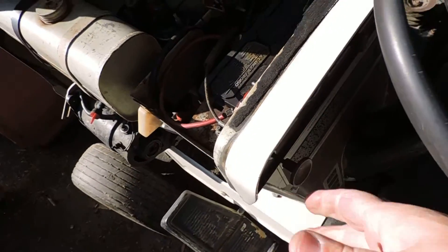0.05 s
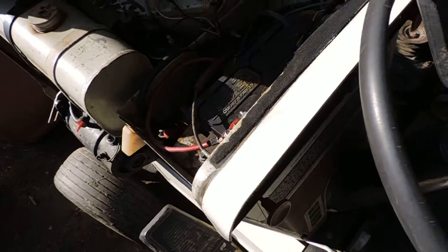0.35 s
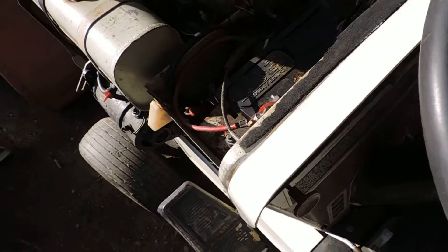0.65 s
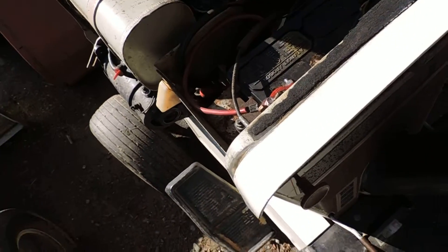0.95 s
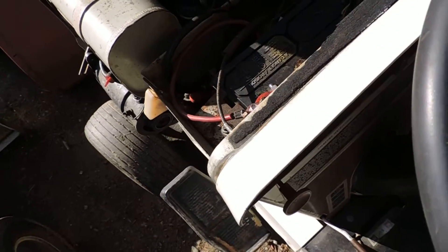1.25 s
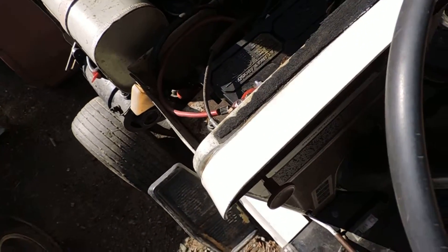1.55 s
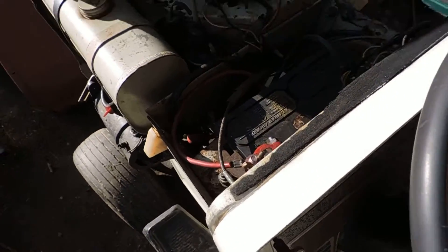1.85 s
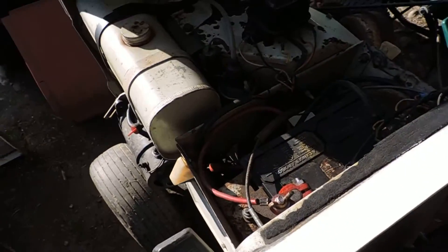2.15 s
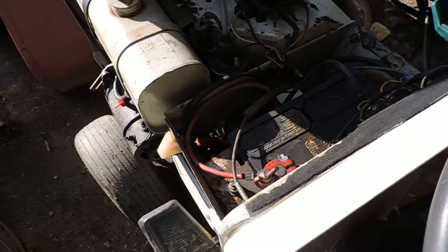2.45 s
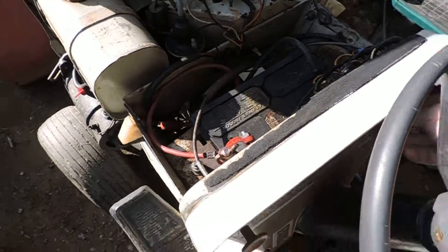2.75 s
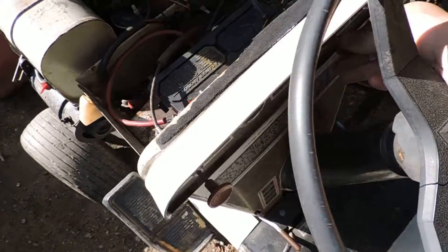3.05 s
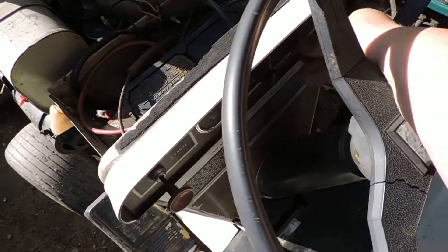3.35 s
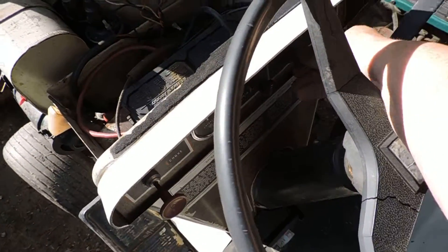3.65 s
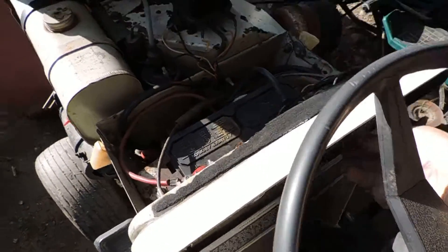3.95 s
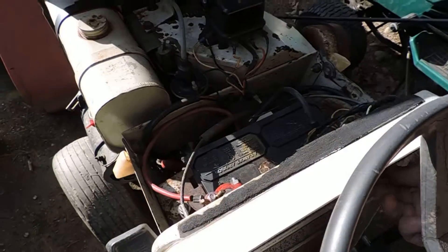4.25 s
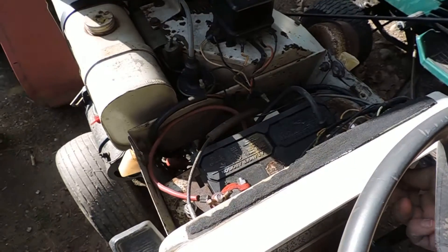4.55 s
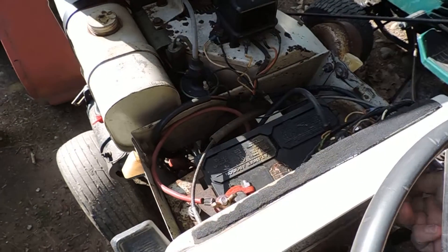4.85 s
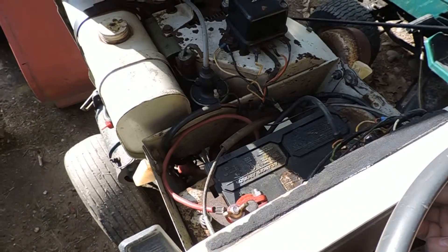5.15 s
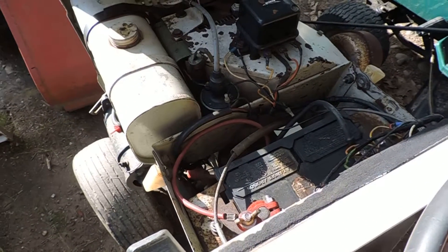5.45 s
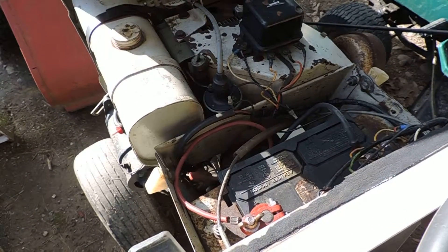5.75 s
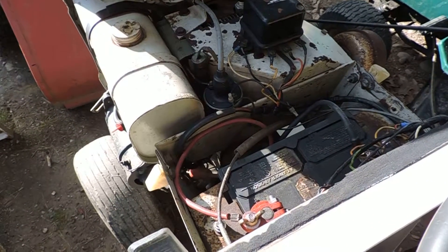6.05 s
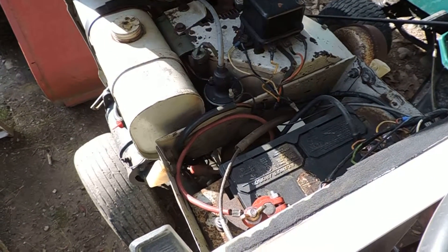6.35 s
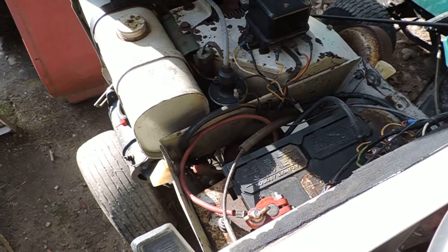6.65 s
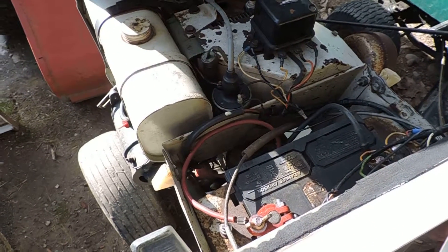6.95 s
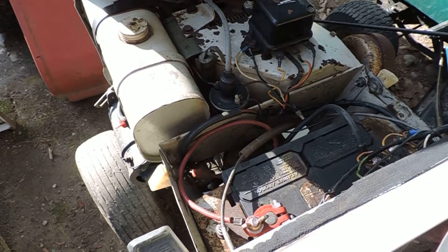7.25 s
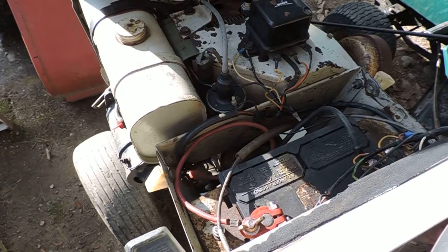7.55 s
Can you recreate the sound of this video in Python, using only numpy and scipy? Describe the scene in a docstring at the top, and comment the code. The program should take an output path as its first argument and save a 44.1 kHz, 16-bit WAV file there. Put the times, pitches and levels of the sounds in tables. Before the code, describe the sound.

Close to an old garden tractor outdoors, a hand knocks and brushes the dash while far birds chirp and gusts rumble softly on the microphone. A sharp key click is followed by a loud solenoid clunk and a fast chatter that rings the steel of the engine bay. The chatter comes in three bursts with short pauses, the background sinking under each, and the engine does not start.

```python
"""A yard, the microphone close to an old garden tractor that fails to start. At first there is only a
distant rush, wind on the microphone and far birds; a hand knocks and brushes the dash. At 3.5 s the key
snaps round, at 4.2 s the starter solenoid slams in. On the weak battery its plunger lets go and pulls in
about 21 times a second, ringing the steel of the engine bay while the background sinks.
Two more tries chatter at 5.4 s and 7 s."""
import sys
import numpy as np
from scipy import signal
from scipy.fft import rfft, irfft, next_fast_len
from scipy.io import wavfile
from scipy.ndimage import map_coordinates

SR = 44100
rng = np.random.default_rng(int(sys.argv[2]) if len(sys.argv) > 2 else 0)


def generate_wav(signal):
    """Clip the signal to [-1, 1] and save it as 16-bit WAV at the path in sys.argv[1]."""
    frames = np.transpose(np.atleast_2d(signal))
    scaled = np.clip(frames, -1, 1) * 32767
    pcm = np.round(scaled).astype(np.int16)
    wavfile.write(sys.argv[1], SR, pcm)


N = 335160
RING_T = np.arange(SR // 7) / SR  # time axis of one blow

# Levels in the tables are relative; each source adds its own gain.
# spectra of the distant rush and of wind on the microphone: f/Hz, level/dB
RUSH_SPECTRUM = [(71, -29.5), (120, 1), (157, -10), (267, -10), (321, -7.5), (592, -12), (773, -6),
                 (1050, -7), (1720, -16), (2990, -29.5), (3900, -34), (4320, -36), (14400, -47.5),
                 (16000, -45)]
WIND_SPECTRUM = [(11, -17.5), (18, 5), (55, 4), (98, -4.5), (237, -27), (267, -34), (300, -20.5),
                 (390, -52), (660, -120)]
# likeness of left and right, for far and for near sound: f/Hz, correlation
FAR_LIKENESS = [(100, 1), (400, 0.85), (1200, 0.73), (2400, 0), (4500, 0)]
NEAR_LIKENESS = [(100, 0.99), (600, 0.96), (1500, 0.89), (2500, 0.67), (4500, .25), (9000, 0.033)]
# gusts on the microphone: peak t/s, half length/s, left rise/dB, right rise/dB
GUSTS = [(0.618, .16, 7.5, -0.5), (0.987, 0.058, 17.5, 0), (2.104, 0.36, 17.5, 2), (3.555, 0.087, 3, 9.5),
         (3.976, 0.21, 10, 7), (4.31, 0.08, 16, 6.5), (5.29, 0.1, 10, 6), (6.85, 0.19, 4, 2.5)]
# dips of the background where the tractor is loud: from t/s, until t/s, depth/dB
DIPS = [(3.527, 3.644, 6), (4.173, 5.08, 15.5), (5.35, 6.507, 13.5), (6.926, 7.6, 12)]
# far bird chirps: t/s, length/s, start f/Hz, end f/Hz, level/dB
CHIRPS = [(0.707, 0.044, 3850, 4100, -65), (0.923, .05, 4400, 4750, -71), (1.521, 0.11, 3620, 2900, -61),
          (2.315, 0.05, 4600, 4800, -64), (2.37, 0.035, 4000, 3900, -69), (2.51, 0.054, 3600, 4250, -64.5),
          (3.049, 0.068, 4500, 3020, -58.5), (3.174, .1, 4520, 2600, -63), (3.87, .045, 4540, 4990, -67)]
# the yard's reverberation: f/Hz, T60/s
YARD_T60 = [(200, 0.73), (1000, 0.21), (4000, 0.38), (12000, .15)]
# dense ring of the metalwork, dying away: f/Hz, T60/s
METAL_T60 = [(200, 0.25), (800, 0.11), (2000, 0.079), (4500, 0.06), (9000, 0.034), (14000, 0.044)]
# the same ring building up: f/Hz, rise time/s
METAL_RISE = [(200, 0.0039), (800, 0.01), (2000, 0.0089), (4500, 0.00095), (12000, .0003)]
# modes of the dash, solenoid housing, frame and engine bay: f/Hz, width/Hz, level/dB
DASH_MODES = [(436, 24.8, 0), (445, 6.2, -4), (611.5, 19, 1), (752, 35, -4), (1166, 22, -7.5),
              (1470, 40, -10.5), (1630, 76, -4), (2340, 98, -5.5)]
HOUSING_MODES = [(850, 45, -7), (1045, 50, -7), (1245, 45, -14), (1500, 45, -14), (1683, 48, 1),
                 (1890, 48, -3), (1990, 45, -9), (2130, 55, -6), (2408, 65, -11), (2705, 60, -13),
                 (3536, 65, -13), (4020, 70, -17)]
FRAME_MODES = [(197.8, 13, -4.5), (290.6, 8.2, -3), (332.3, 9.9, 0.5), (436.8, 18, 4.5)]
BAY_MODES = [(580, 16, 0), (663.4, 45, -5), (846, 39, -1.5), (979, 38, 9), (1239, 14.5, 0), (1357, 29, -32),
             (1495, 28, -8.5), (1668, 71, -22), (1870, 31, -13), (1956, 16, -34), (2178, 84, -3.5),
             (2498, 58, 1.5), (2715, 34, 3), (2950, 49, -24), (2996, 32, 2), (3055, 64, -8.5),
             (3534, 50, -33), (3910, 26, -37), (3905, 71, -6), (4270, 66, -26), (4590, 47, -5),
             (5000, 30, -2.5), (5360, 36, -3.5), (5270, 40, -18)]
# spectra of the hand's knock and scrape and the key's snap: f/Hz, level/dB
KNOCK_SPECTRUM = [(150, -8), (430, 8.5), (620, 4.5), (900, 1), (1350, 7), (2200, -2), (4000, -20),
                  (6500, -39), (15000, -42)]
SCRAPE_SPECTRUM = [(200, -9), (1000, -2), (2500, 11), (4000, 2), (6000, -6), (15000, -7)]
SNAP_SPECTRUM = [(200, -27), (450, -15.5), (650, -4.5), (1000, -16.5), (1600, 1.5), (2250, -3.5),
                 (2600, -12.5), (3300, -6.5), (4400, -14.5), (5500, -7), (8000, -6), (12000, -9.5),
                 (16000, -19)]
# spectra of the solenoid's thud, its contacts and the steel it rattles: f/Hz, level/dB
THUD_SPECTRUM = [(100, -28.5), (320, -10.5), (480, -13.5), (850, -2), (1350, -8.5), (2050, -4), (2500, -16),
                 (4000, -14), (7000, -34.5), (15000, -33.5)]
CONTACT_SPECTRUM = [(3000, -25.5), (5200, -4.5), (7500, -9.5), (9200, -5), (9900, -2), (10800, -5.5),
                    (12500, -2), (14200, -0.5), (15200, -13), (16500, -23.5)]
RATTLE_SPECTRUM = [(100, -23), (250, -3.5), (430, -6.5), (500, -9), (600, 1), (1000, 3.5), (1150, -1.5),
                   (2000, -1), (3000, -3.5), (4500, -5), (6500, -26), (9000, -30)]
# the hand on the dash: t/s, knock level/dB, scrape level/dB, scrape length/s
TOUCHES = [(1.042, -29, -74, .02), (1.154, -63, -64, 0.018), (1.263, -40, -54, 0.045),
           (1.309, -41.5, -59, 0.039), (1.361, -39, -60, 0.013), (1.458, -51, -56.5, 0.0082),
           (1.544, -60, -54.5, 0.016), (1.594, -69, -62.5, 0.07), (1.801, -64, -69, 0.082),
           (1.91, -41.5, -55.5, 0.0074), (2.95, -59, -60.5, 0.019), (6.819, -52.5, -61, 0.016)]
# detents of the key switch: t/s, level/dB
DETENTS = [(3.534, -34), (3.5382, -12.5), (3.542, -20.5), (4.146, -38.5), (4.941, -40), (5.349, -46),
           (6.303, -33.5), (6.915, -45.5)]
# full strokes, the plunger pulling right in or dropping out: t/s, thud/dB, ring/dB, contact/dB
STROKES = [(4.161, -14.5, -10, -25), (4.945, -30.5, -48.5, -60), (5.371, -30.5, -38.5, -47),
           (6.307, -24.5, -36, -53.5), (6.936, -21, -43, -31.5)]
# tries of the key: first click t/s, click count, start rate/Hz, midway rate/Hz, end rate/Hz,
# steady body level/dB, steady treble level/dB, extra loudness at the start/dB
TRIES = [(4.2153, 15, 20.58, 21.18, 19.94, -39.3, -41.2, 14),
         (5.3701, 21, 20.95, 22.61, 21.69, -36.8, -38, 3.5), (6.9922, 14, 22.03, 21.11, 22.09, -35, -37, 4)]

RUSH_DB, HISS_DB, BREEZE_DB = -47, -67.5, -48.5  # before gusts, dips and panning
SINK_DB_PER_S, RECOVER_DB_PER_S, HISS_DIP_SHARE = 47.5, 13, 0.92
FADE_S, CLICK_JITTER_S, CLICK_SCATTER_DB = 0.23, 0.0003, 0.8
TOP_HZ = 16200


def amp(db):
    """Decibels to gain."""
    return 10 ** (np.asarray(db) / 20)


def unit(x):
    """Scale to rms 1."""
    return x / np.sqrt(np.mean(x ** 2) + 1e-20)


def blow(x):
    """Scale a short stereo sound to the energy of 10 ms at rms 1."""
    return x * np.sqrt(SR / 100 / (np.sum(x ** 2) / 2 + 1e-20))


def along(points, hz):
    """Read (f/Hz, value) points on a log frequency axis."""
    f, v = np.transpose(points)
    return np.interp(np.log(hz + 1), np.log(f + 1), v)


def wobble(rate, size=N):
    """A smooth random curve, rate knots a second."""
    knots = rng.standard_normal(int(size * rate / SR) + 4)
    return map_coordinates(knots, [np.arange(size) * rate / SR])


def filtered(x, response):
    """Filter x by a gain given as a function of frequency."""
    m = next_fast_len(x.shape[-1] + SR // 20)
    return irfft(rfft(x, m) * response(np.fft.rfftfreq(m, 1 / SR)), m)[..., :x.shape[-1]]


def lowpass(x, corner_hz, order):
    """Roll off the treble above the corner."""
    return filtered(x, lambda hz: 1 / (1 + (hz / corner_hz) ** order))


def panned(x, db):
    """Lean a sound to the left by db."""
    return x * amp(np.array([[db], [-db]]) / 2)


def add(track, s, sound):
    """Mix a sound into the track at time s."""
    part = track[:, round(s * SR):][:, :sound.shape[-1]]
    part += sound[..., :part.shape[-1]]


def stereo_angle(likeness, hz):
    """The angle from mid toward side that gives this likeness of left and right."""
    return np.arccos(np.clip(along(likeness, hz), -1, 1)) / 2


def noise(spectrum, size, likeness=NEAR_LIKENESS):
    """Coloured stereo noise of rms 1, alike in the bass and unrelated in the treble."""
    def mid_side_gain(hz):
        angle = stereo_angle(likeness, hz)
        return amp(along(spectrum, hz)) * [np.cos(angle), np.sin(angle)]
    mid, side = filtered(rng.standard_normal((2, size)), mid_side_gain)
    return unit(np.array([mid + side, mid - side]))


def background_dip():
    """How many dB the background has sunk: at set times it falls quickly, holds and recovers slowly."""
    t = np.arange(N) / SR
    start, until, depth_db = np.transpose(DIPS)[..., None]
    sunk_db = np.minimum(SINK_DB_PER_S * (t - start), depth_db - RECOVER_DB_PER_S * (t - until))
    return np.clip(sunk_db, 0, depth_db).max(axis=0)


def distant_rush(sunk_db):
    """Open air far from the microphone: a low rush under a thin hiss that dips a little less."""
    air = noise(RUSH_SPECTRUM, N, FAR_LIKENESS)
    low = lowpass(air, corner_hz=4000, order=4)
    rush = panned(amp(RUSH_DB - sunk_db + 0.36 * wobble(2.3)) * low, -.8)
    return rush + amp(HISS_DB - HISS_DIP_SHARE * sunk_db) * unit(air - low)


def wind():
    """Eddies buffet each microphone port in lumps of its own; gusts swell and fade over a breeze."""
    peak, half, left_db, right_db = np.transpose(GUSTS)
    swells = np.exp(-((np.arange(N) / SR - peak[:, None]) / half[:, None]) ** 2)
    gust_db = np.array([left_db, right_db]) @ swells
    eddies = filtered(rng.standard_normal((3, N)), lambda hz: amp(along(WIND_SPECTRUM, hz)))
    lumps = amp(1.3 * np.array([wobble(14), wobble(14)]))
    ports = (eddies[:2] + 0.94 * eddies[2]) * lumps  # the third stream reaches both ports
    return panned(amp(BREEZE_DB + gust_db) * unit(ports), -2.5)


def birds():
    """Birds far off: gliding whistles, rough in pitch and loudness."""
    out = np.zeros((2, N))
    for s, length, start_hz, end_hz, db in CHIRPS:
        u = np.linspace(0, 1, int(length * SR))
        pitch = (start_hz + (end_hz - start_hz) * u) * (1 + .022 * wobble(500, len(u)))
        swell = amp(db + 2.3 * wobble(120, len(u))) * np.sin(np.pi * u)
        add(out, s, swell * np.sin(2 * np.pi * np.cumsum(pitch) / SR))
    return out


def yard_echo(x):
    """The yard scatters a faint tail back to the microphone; a nearby wall returns a dull slap."""
    scatter = noise([(200, 5.0), (1000, -17.5), (4000, -17), (14000, -29.0)], SR // 2)
    hz, t, bands = signal.stft(scatter, SR, nperseg=256)
    decay = amp(-60 * t / along(YARD_T60, hz)[:, None])
    _, tail = signal.istft(bands * decay, SR, nperseg=256)
    out = np.zeros((2, N))
    add(out, .012, amp(-15.5) * signal.fftconvolve(x, tail / np.linalg.norm(tail[0]), axes=1))
    add(out, .027, amp(-9.5) * lowpass(x, corner_hz=550, order=2))
    return out


def clatter(spectrum, stretch=1.0):
    """Countless overlapping modes of metalwork: low ones build slowly and last, high ones crack and die."""
    centres = np.geomspace(200, 14000, 7)
    split = lambda hz: np.array([along(np.c_[centres, row], hz) for row in np.eye(7)])[:, None]
    bands = filtered(noise(spectrum, len(RING_T)), split)
    t60 = stretch * along(METAL_T60, centres)[:, None]
    rise_s = stretch * along(METAL_RISE, centres)[:, None]
    envelopes = amp(-60 * RING_T / t60) * (1 - np.exp(-RING_T / rise_s))
    envelopes /= np.linalg.norm(envelopes, axis=1, keepdims=True)
    return blow(np.sum(bands * envelopes[:, None], axis=0))


def mode_phases(modes):
    """The phase at which each mode reaches the two microphone ports; high modes differ more."""
    spread = stereo_angle(NEAR_LIKENESS, np.array(modes)[:, 0])
    shared = rng.uniform(0, 2 * np.pi, len(modes))
    return shared + np.outer([1, -1], spread * rng.choice([-1, 1], len(modes)))


def ring(modes, phases, rise_s, scatter_db):
    """Damped modes, struck at slightly new strengths every time."""
    hz, width, db = np.transpose(modes)
    strengths = width * amp(db + scatter_db * rng.standard_normal(len(hz)))
    decays = np.exp(-np.pi * width[:, None] * RING_T)
    waves = np.sin(2 * np.pi * hz[:, None] * RING_T + phases[..., None]) * decays
    return blow(strengths @ waves * (1 - np.exp(-RING_T / rise_s)))


def hand_on_dash():
    """Soft knocks on the dash, close by, each with a short, gritty brush of skin."""
    out, t = np.zeros((2, N)), np.arange(SR // 2) / SR
    for s, knock_db, scrape_db, length in TOUCHES:
        panel = ring(DASH_MODES, mode_phases(DASH_MODES), rise_s=.001, scatter_db=1.5)
        panel = lowpass(panel, corner_hz=1500, order=6)  # a soft contact leaves the high modes still
        add(out, s, amp(knock_db - 5) * (panel + clatter(KNOCK_SPECTRUM, stretch=0.97)))
        stroke = 2 * t / length * np.exp(1 - 2 * t / length)
        grit = unit(amp(2.5 * wobble(200, len(t))))
        add(out, s, amp(scrape_db) * stroke * grit * noise(SCRAPE_SPECTRUM, len(t)))
    return out


def key_switch():
    """The switch snaps over its detents, just left of centre, and shakes the dash panel."""
    out = np.zeros((2, N))
    for s, db in DETENTS:
        panel = ring(DASH_MODES, mode_phases(DASH_MODES), rise_s=.002, scatter_db=1.5)
        snap = blow(noise(SNAP_SPECTRUM, len(RING_T)) * np.exp(-RING_T / .0012))
        switch = clatter(SNAP_SPECTRUM, stretch=0.86) + amp(-6.5) * snap
        add(out, s, amp(db - 12) * (panned(switch, 1.4) + amp(-10.5) * panel))
    return out


def solenoid_clunks():
    """A full stroke cracks on the contacts, then thuds into the mount and rings the housing."""
    out = np.zeros((2, N))
    for s, thud_db, ring_db, contact_db in STROKES:
        housing = ring(HOUSING_MODES, mode_phases(HOUSING_MODES), rise_s=.006, scatter_db=.6)
        add(out, s, amp(contact_db) * panned(clatter(CONTACT_SPECTRUM), 2.4))
        thud = clatter(THUD_SPECTRUM, stretch=0.9)
        add(out, s + .0015, panned(amp(thud_db - 6.5) * thud + amp(ring_db - 5) * housing, -.6))
    return out


def bay_rattle():
    """Shaken steel, coloured by the engine bay: peaks at its resonances, valleys between them."""
    centre, width, _ = np.transpose(BAY_MODES)[..., None]
    def colour(hz):
        peaks = np.sum(1 / (1 + (2 * (hz - centre) / width) ** 2), axis=0)
        among_modes = (hz > centre[0]) & (hz < centre[-1])
        return np.where(among_modes, np.minimum(peaks, 1), .5) ** .38
    return blow(filtered(clatter(RATTLE_SPECTRUM), colour))


def contact_tick():
    """The copper contacts meet with a tick of about a millisecond."""
    hiss = noise([(3500, -8), (6000, -18.0), (11000, -12.5), (14000, 3.5), (16500, -11.0)], len(RING_T))
    return blow(hiss * RING_T * np.exp(-RING_T / 0.00021))


def plunger_clicks():
    """Rows of t/s, body/dB, treble/dB: in each try the clicks start louder and fade to a steady level."""
    rows = []
    for start, count, *rate_hz, body_db, treble_db, start_boost_db in TRIES:
        gaps = 1 / np.interp(np.linspace(0, 1, count - 1), [0, .5, 1], rate_hz)  # the rate drifts
        age = np.r_[0, np.cumsum(gaps)]
        late, louder = rng.standard_normal((count, 2)).T
        loudness_db = start_boost_db * np.exp(-age / FADE_S) + CLICK_SCATTER_DB * louder
        rows += zip(start + age + CLICK_JITTER_S * late, body_db + loudness_db, treble_db + loudness_db)
    return rows


def solenoid_chatter():
    """The battery sags under load, the plunger lets go and pulls in again: a like blow each time."""
    out = np.zeros((2, N))
    bay_phases, frame_phases = mode_phases(BAY_MODES), mode_phases(FRAME_MODES)
    usual_rattle, usual_crack = bay_rattle(), clatter(CONTACT_SPECTRUM)
    # part of every blow repeats the usual one, the rest is new
    vary = lambda usual, new: np.sqrt(.4) * usual + np.sqrt(.6) * new
    for s, body_db, treble_db in plunger_clicks():
        bay_shift = rng.uniform(-1, 1, len(BAY_MODES))
        bay = ring(BAY_MODES, bay_phases + bay_shift, rise_s=.006, scatter_db=2.5)
        frame_shift = 1.3 * rng.standard_normal(len(FRAME_MODES))
        frame = ring(FRAME_MODES, frame_phases + frame_shift, rise_s=.007, scatter_db=3)
        body = amp(-3.5) * vary(usual_rattle, bay_rattle()) + amp(-7.5) * bay + amp(-14.5) * frame
        crack = amp(-6) * vary(usual_crack, clatter(CONTACT_SPECTRUM))
        tick = amp(-9 + 2 * rng.standard_normal()) * contact_tick()
        # the contacts never land on quite the same spot, so the treble changes colour
        tint = np.c_[np.geomspace(4000, 16000, 10), 2.5 * rng.standard_normal(10)]
        treble = filtered(crack + tick, lambda hz: amp(along(tint, hz)))
        add(out, s, amp(body_db) * panned(body, -1.0) + amp(treble_db) * panned(treble, 2.8))
    return out


def scene():
    """The tractor close to the microphone, the yard around it."""
    tractor = solenoid_chatter() + solenoid_clunks() + key_switch() + hand_on_dash()
    song, sunk_db = birds(), background_dip()
    echo = yard_echo(tractor + amp(14) * song)  # the far birds carry more echo
    return tractor + song + echo + distant_rush(sunk_db) + amp(-sunk_db) * wind()


def record(dry):
    """The recorder keeps nothing above its band limit."""
    return lowpass(dry, TOP_HZ, order=120)


dry = scene()
out = record(dry)
generate_wav(out)
```